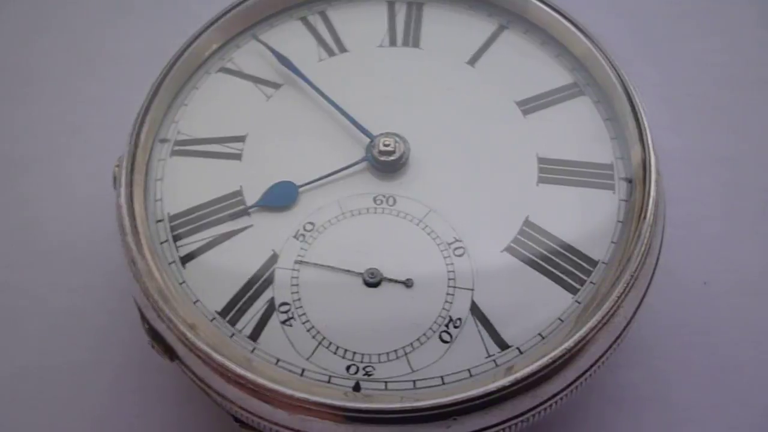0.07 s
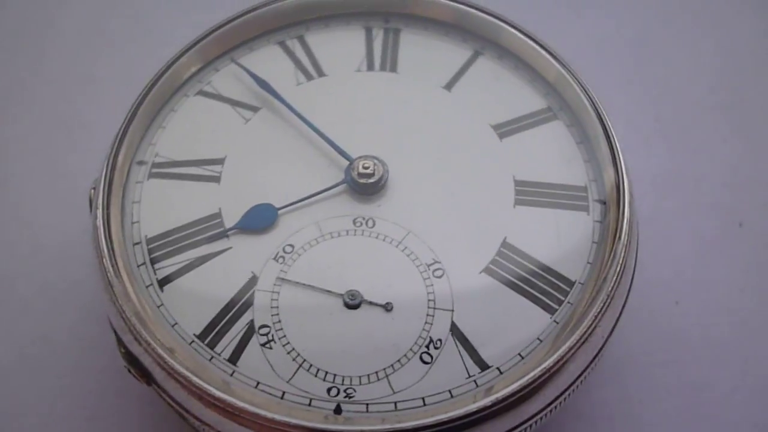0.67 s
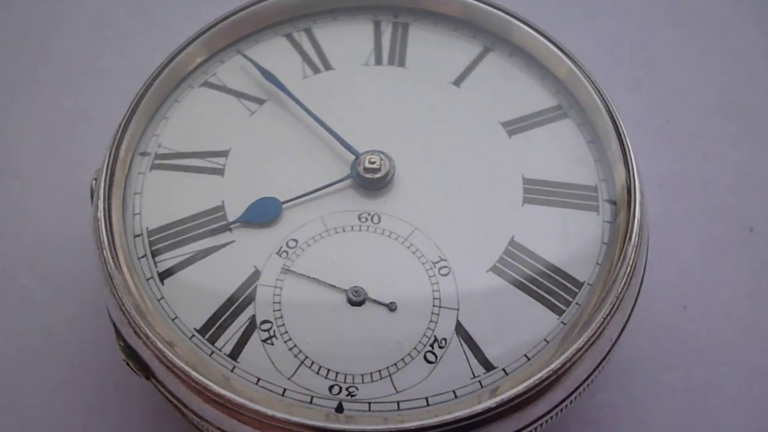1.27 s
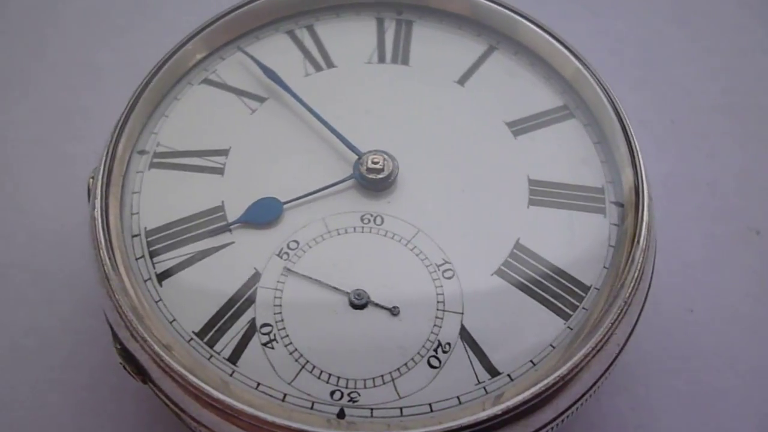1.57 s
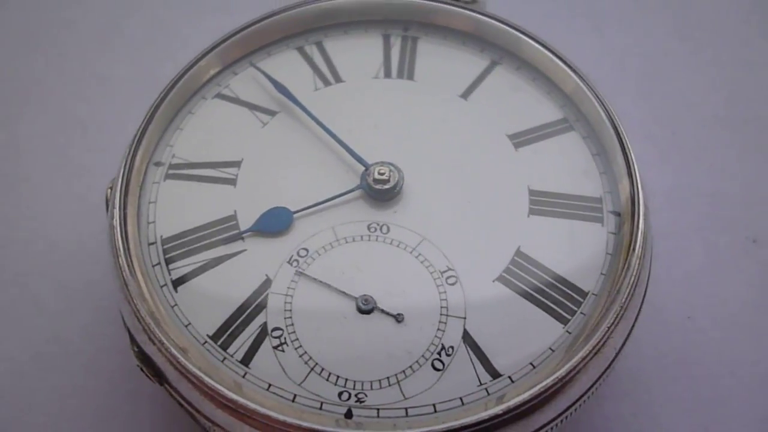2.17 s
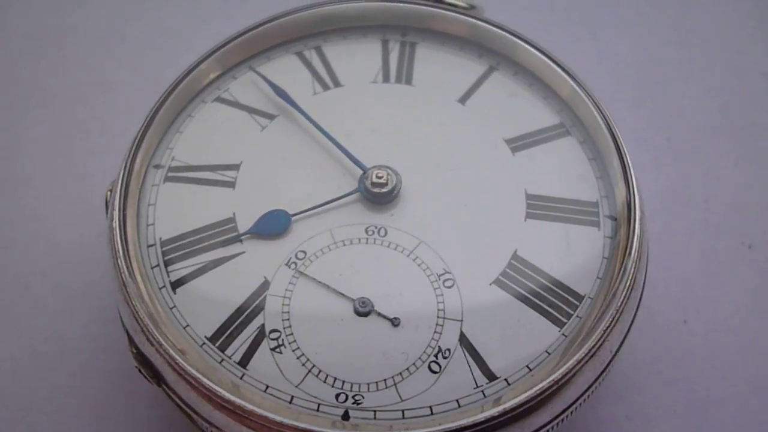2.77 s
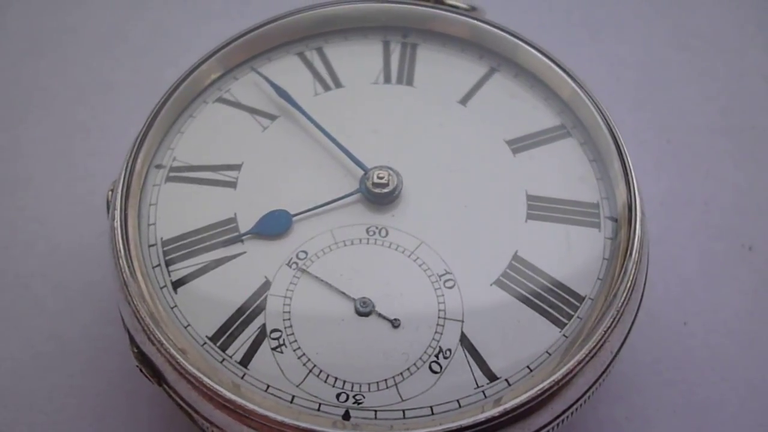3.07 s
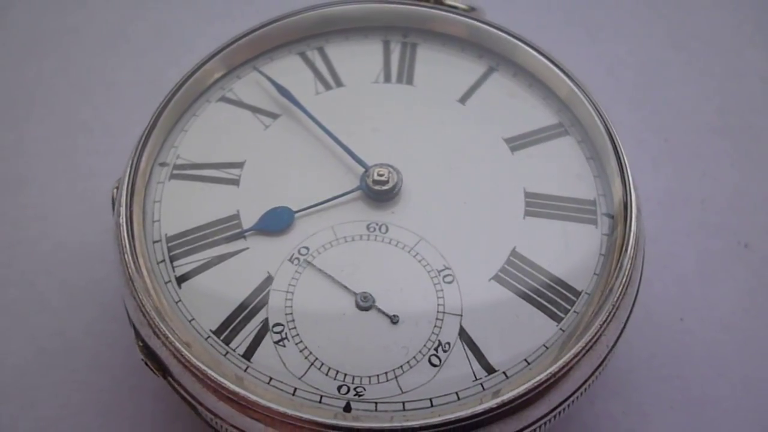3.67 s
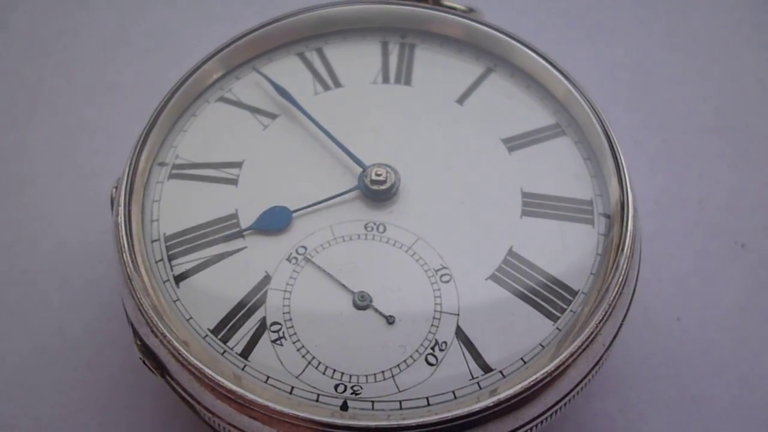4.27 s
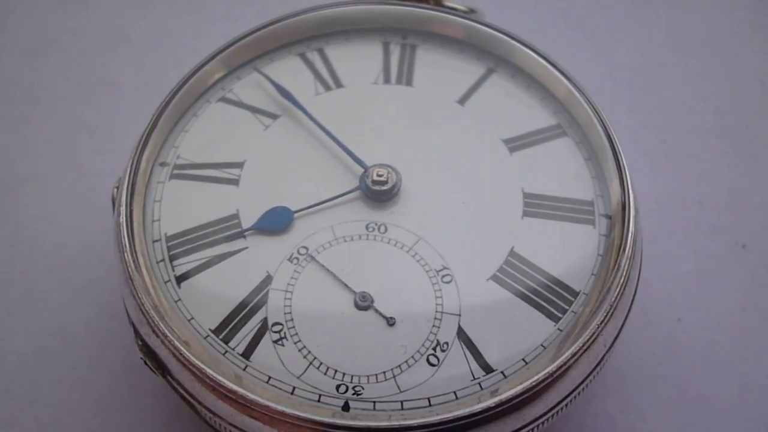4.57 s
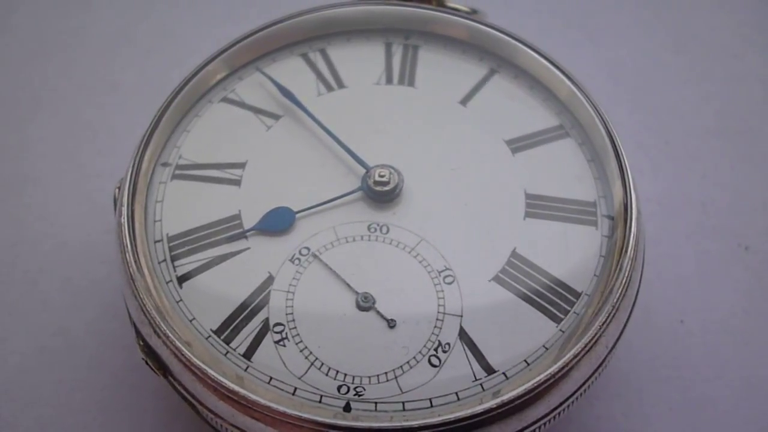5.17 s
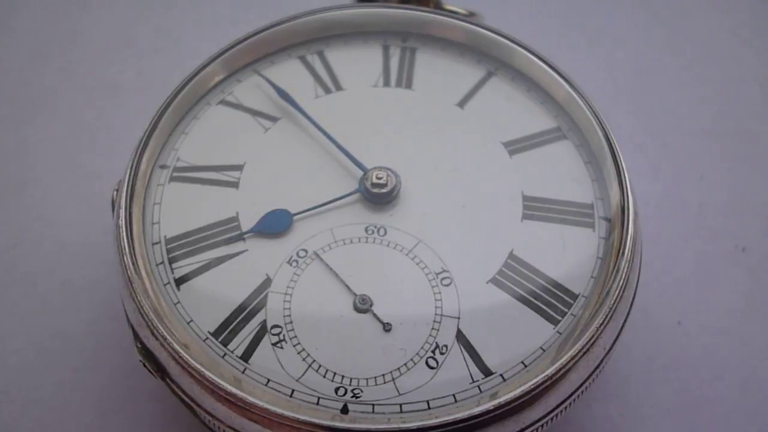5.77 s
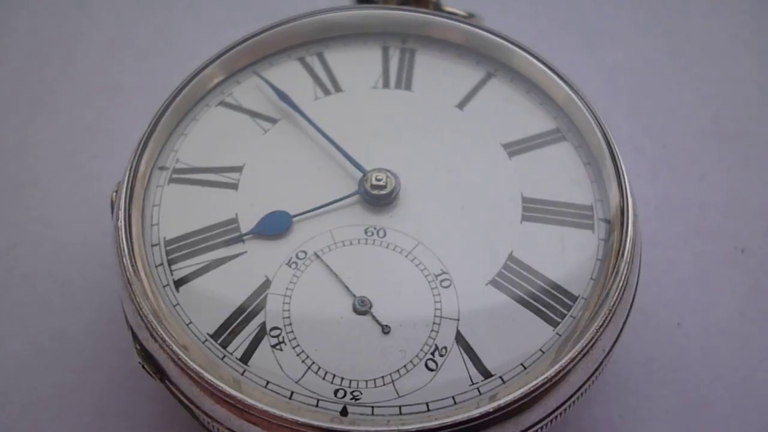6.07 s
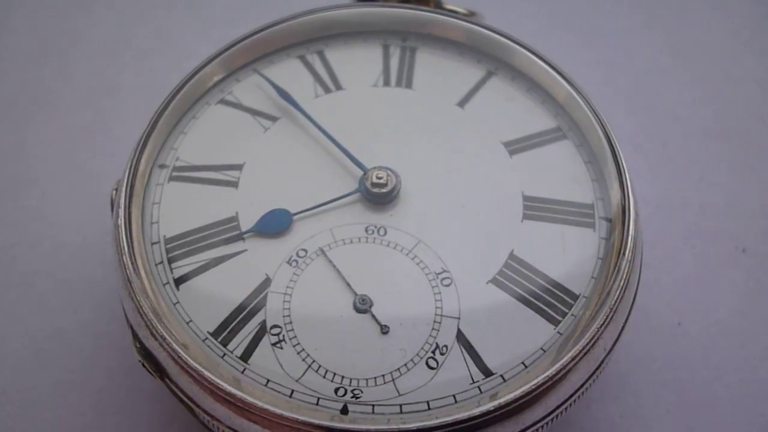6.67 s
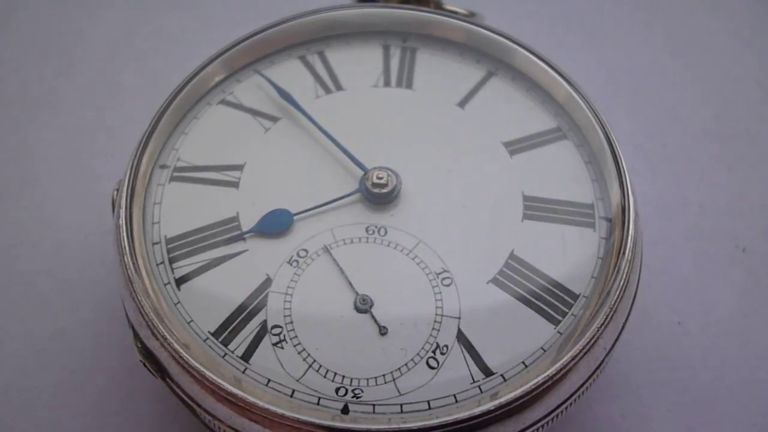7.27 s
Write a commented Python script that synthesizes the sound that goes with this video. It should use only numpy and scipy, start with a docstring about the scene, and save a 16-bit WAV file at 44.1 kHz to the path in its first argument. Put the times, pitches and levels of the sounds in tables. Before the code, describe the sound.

In a quiet room, a close microphone picks up the light, quick, dry ticking of a pocket watch, set in steady hiss and low background hum. Early on there is a slight rustle with a few tiny knocks. A faint low drone rises briefly in the distance and dies away, and the odd soft tap follows while the ticking carries on at the same pace.

```python
"""Pocket watch in a quiet room

An old watch on a table beats 4.5 times a second. At each beat the escapement unlocks, a tooth drops
on a pallet and the lever rattles; all three ring the metal case. A small camera close above adds
hiss and a thin whine. Behind: room murmur, faint hum, a passing drone, a rustle and tiny taps."""
import sys
import numpy as np
from scipy import signal
from scipy.fft import rfft, irfft, next_fast_len
from scipy.io import wavfile

SR = 44100
rng = np.random.default_rng(int(sys.argv[2]) if len(sys.argv) > 2 else 0)


def waveform_to_disk(signal):
    """Save audio, clipped to [-1, 1], as 16-bit WAV at the path in sys.argv[1]."""
    frames = np.transpose(np.atleast_2d(signal))
    scaled = np.clip(frames, -1, 1) * 32767
    samples = np.round(scaled).astype(np.int16)
    wavfile.write(sys.argv[1], SR, samples)


N = 331191


def undb(db):
    """Decibels to gain."""
    return 10 ** (np.asarray(db) / 20)


def unit(x):
    """Scale to rms 1."""
    return x / np.sqrt(np.mean(x ** 2))


def add(track, start_s, sound):
    """Mix a sound into a track."""
    i = int(np.clip(start_s * SR, 0, N - 1))
    track[i:i + len(sound)] += sound[:N - i]


def coloured(points):
    """Noise of rms 1, spectrum through (freq_hz, gain_db) points."""
    hz, db = np.transpose(points)
    freq_hz = np.maximum(np.fft.rfftfreq(N, 1 / SR), 1)
    gain = undb(np.interp(np.log(freq_hz), np.log(hz), db))
    return unit(irfft(rfft(rng.standard_normal(N)) * gain, N))


def band(centre_hz, width_hz, size):
    """Noise of rms 1 in one steep-skirted resonance."""
    detuning = 2 * (np.fft.rfftfreq(size, 1 / SR) - centre_hz) / width_hz
    return unit(irfft(rfft(rng.standard_normal(size)) / (1 + detuning ** 2), size))


def hum_lines(rows):
    """Wavering hum: one narrow noise band per row."""
    return sum(undb(db) * band(hz, width_hz, next_fast_len(N))[:N] for hz, db, width_hz in rows)


def wander(rate_hz):
    """Slow random drift of rms 1."""
    place = np.arange(N) / SR * rate_hz
    return unit(np.interp(place, np.arange(1024), rng.standard_normal(1024)))


def room(drift_db=0.3):
    """Low murmur that drifts and eases slightly, with faint hum."""
    # murmur loudness: time_s, level_db
    murmur_levels = [(0, -53.5), (3.9, -54.5), (4.8, -54), (7.5, -55.3)]
    # murmur spectrum: freq_hz, gain_db
    murmur_colour = [(20, -21), (45, -6.5), (75, -3), (130, -1), (230, 2), (380, -0.5), (520, -3.5),
                     (900, -10.5), (2000, -44)]
    # room hum: pitch_hz, level_db, width_hz
    hum = [(131, -71, 21), (193.4, -67.5, 9), (254.8, -72, 4.5), (331.4, -73.5, 4.7), (396, -71.5, 4.6),
           (654, -76, 2.6)]
    level_db = np.interp(np.arange(N) / SR, *np.transpose(murmur_levels)) + drift_db * wander(rate_hz=6)
    return undb(level_db) * coloured(murmur_colour) + hum_lines(hum)


def hiss(level_db=-55):
    """Steady camera hiss."""
    # hiss spectrum: freq_hz, gain_db
    colour = [(20, -3.5), (200, -0.5), (600, -0.5), (1000, 1), (1600, -1.5), (2500, -5), (4000, -8),
              (5500, -11), (7000, -12), (9000, -14.5)]
    return undb(level_db) * coloured(colour)


def whine():
    """Thin, steady sines from the camera's electronics."""
    # whine tones: pitch_hz, rms_db
    tones = [(3555, -95), (4390, -92), (6665.5, -84.5)]
    t = np.arange(N) / SR
    return sum(undb(db) * np.sqrt(2) * np.sin(2 * np.pi * (hz * t + rng.random())) for hz, db in tones)


def drone(start_s=2.8, attack_s=0.45, hold_s=0.15, release_s=1.1, speedup_per_s=0.18):
    """A distant drone swells, holds, then speeds up and climbs in pitch as it fades."""
    # drone bands before the climb: pitch_hz, level_db, width_hz
    bands = [(123, -58.5, 5.4), (175, -63, 32), (327, -64, 30)]
    t = np.arange(N) / SR
    corners_s = np.cumsum([start_s, attack_s, hold_s, release_s])
    speed = 1 + speedup_per_s * np.clip(t - corners_s[2], 0, release_s)
    sound = np.interp(np.cumsum(speed), np.arange(N), hum_lines(bands))
    return np.interp(t, corners_s, [0, 1, 1, 0]) * sound


def rustle(level_db=-63, peak_s=0.53, half_width_s=0.34, patchy_db=4):
    """Soft, uneven rustle of a hand settling on the camera."""
    grip = np.interp(np.linspace(0, 299, N), np.arange(300), rng.standard_normal(300))
    swell = np.exp(-((np.arange(N) / SR - peak_s) / half_width_s) ** 2)
    friction = band(centre_hz=1600, width_hz=2200, size=next_fast_len(N))[:N]
    return undb(level_db + patchy_db * grip) * swell * friction


def taps(attack_s=0.00068, size=16384):
    """Tiny knocks around the camera, each dying away in one broad resonance."""
    # knocks: start_s, level_db, centre_hz, width_hz, decay_s
    knocks = [(0.266, -50, 1600, 1500, .005), (.946, -53.5, 3180, 500, 0.006),
              (1.343, -44, 2300, 5000, .002), (1.348, -41, 300, 303, 0.0072),
              (3.114, -45.5, 1360, 550, .006), (3.695, -54, 284, 160, 0.033),
              (5.72, -51.5, 1600, 900, 0.0088)]
    out, t = np.zeros(N), np.arange(size) / SR
    for start_s, level_db, centre_hz, width_hz, decay_s in knocks:
        envelope = np.exp(-t / decay_s) * (1 - np.exp(-t / attack_s))
        add(out, start_s, undb(level_db) * band(centre_hz, width_hz, size) * envelope)
    return out


def chatter(delay_s, spread_s, fade_db, count, size=4096):
    """Force of a quick row of tiny, uneven contacts that tend to weaken."""
    place = (np.arange(count) + rng.random(count)) / count
    at = np.clip(((delay_s + spread_s * place) * SR).astype(int), 0, size - 1)
    force = np.zeros(size)
    np.add.at(force, at, undb(-fade_db * place + 4.2 * rng.standard_normal(count)))
    return force


def case_ring(force, contact, low_db, scatter_db=3.5, snap_db=3, snap_decay_s=0.0016):
    """The case answers a "drop" or "rub" with a dry steel snap and modes that vary each time."""
    # modes of case and movement: pitch_hz, t60_s, tooth_drop_db, lever_rub_db
    modes = [(1630, 0.0092, -16.5, -12), (3080, 0.031, -19, -15.5), (3600, 0.0083, -14.5, -6.5),
             (3540, 0.026, -7, -8), (4160, 0.02, -11, -4), (4600, 0.02, -25.5, -6.5),
             (4580, 0.037, -12, -6), (5080, 0.017, -15, -6), (5540, 0.016, -10, -9), (6140, 0.017, 7, -3),
             (6280, .010, 4, -3), (6600, 0.022, -5, -1.5), (6950, 0.009, -4.5, -1)]
    pitch_hz, t60_s, drop_db, rub_db = np.transpose(modes)
    t = np.arange(len(force)) / SR
    gain_draw, pitch_draw = rng.standard_normal((len(modes), 2)).T
    mode_db = {"drop": drop_db, "rub": rub_db}[contact] + low_db * (pitch_hz < 5700)
    gain = undb(mode_db + scatter_db * gain_draw)
    detuned_hz = pitch_hz * (1 + 0.005 * pitch_draw)
    decay = np.exp(-np.log(1000) * t / t60_s[:, None])
    ringing = gain @ (np.sin(2 * np.pi * detuned_hz[:, None] * t) * decay)
    snap = band(centre_hz=6200, width_hz=5600, size=len(force)) * np.exp(-t / snap_decay_s)
    response = ringing + undb(snap_db + low_db / 2) * snap
    sound = signal.fftconvolve(force, response)[:len(force)]
    return sound / np.sqrt(np.sum(sound ** 2) / (0.004 * SR))  # energy of 4 ms at rms 1


def watch(first_tick_s=0.179, swing_s=0.44358, tock_lag_s=0.2142, tooth_spread_db=2.5):
    """Each full swing of the balance frees both pallets in turn: unlocking, tooth drop, rattle."""
    # pallets, tick then tock: unlock_lead_s, unlock_db, drop_db, rattle_db, low_modes_db
    pallets = [(.012, -58, -57, -57.5, -2.5), (0.0032, -63, -56, -54, -0.5)]
    # ticking turns duller, then brighter: time_s, drop_offset_db, low_modes_offset_db
    tick_colour = [(.35, 3, 3), (.7, -5, 3), (1.8, 0.5, 1.5), (3.4, -1, 2), (4.1, -3, 13), (4.7, 0, -3),
                   (7.4, -1, -3.5)]
    times_s, drop_offset_db, low_offset_db = np.transpose(tick_colour)
    out = np.zeros(N)
    blow = signal.unit_impulse(4096)
    for tick_s in np.arange(first_tick_s, N / SR, swing_s):
        beats_s = (tick_s, tick_s + tock_lag_s)  # under half a swing apart: slightly out of beat
        for beat_s, (lead_s, unlock_db, drop_db, rattle_db, low_modes_db) in zip(beats_s, pallets):
            tooth_db = tooth_spread_db * rng.standard_normal()  # no two teeth land alike
            hit_db = drop_db + np.interp(beat_s, times_s, drop_offset_db) + tooth_db
            low_db = low_modes_db + np.interp(beat_s, times_s, low_offset_db)
            low_db -= 0.7 * tooth_db  # softer landings sound duller
            unlock = chatter(delay_s=0, spread_s=0.0035, fade_db=5, count=4)
            rattle = chatter(delay_s=0.0022, spread_s=0.006, fade_db=6.5, count=5)
            add(out, beat_s - lead_s, undb(unlock_db) * case_ring(unlock, "rub", low_db=8.5))
            add(out, beat_s, undb(hit_db) * case_ring(blow, "drop", low_db))
            add(out, beat_s, undb(rattle_db) * case_ring(rattle, "rub", low_db))
    return out


def scene():
    """The watch close by, the room behind it; mono."""
    return (watch() + taps() + rustle() + room() + drone())[None]


def record(dry):
    """The camera adds hiss, whine and converter offset, cuts the treble and opens after a moment."""
    # camera treble roll-off: freq_hz, gain_db
    roll_off = [(6500, -0.5), (7000, -3), (7500, -5), (8100, -10.5), (8700, -23.5), (9100, -41.5)]
    open_s, cutoff_hz, dc_offset = 0.036, 8750, 0.02
    sound = dry + hiss() + whine()
    treble_gain = undb(np.interp(np.fft.rfftfreq(N, 1 / SR), *np.transpose(roll_off)))
    sound = irfft(rfft(sound) * treble_gain, N) + dc_offset
    sound *= np.arange(N) / SR > open_s
    lowpass = signal.ellip(10, 0.1, 80, cutoff_hz, fs=SR, output="sos")
    return signal.sosfilt(lowpass, sound)


dry = scene()
out = record(dry)
waveform_to_disk(out)
```